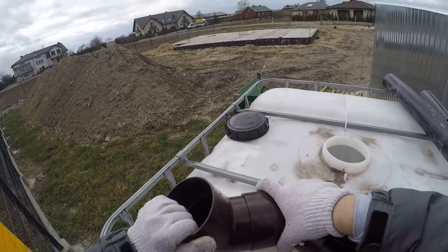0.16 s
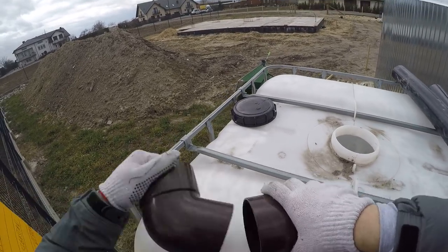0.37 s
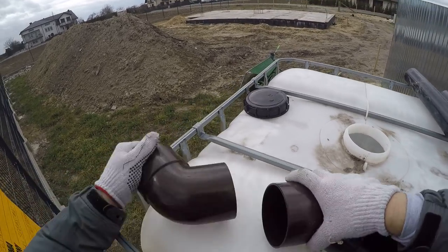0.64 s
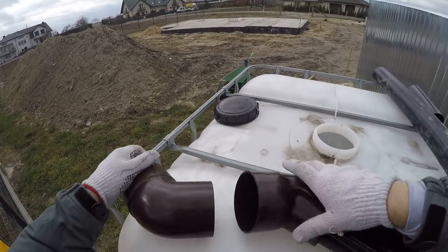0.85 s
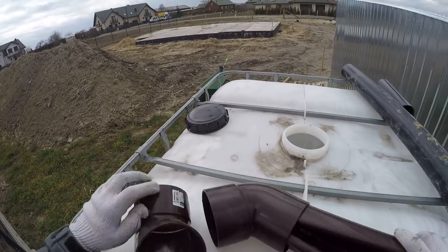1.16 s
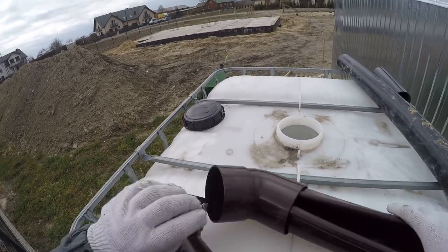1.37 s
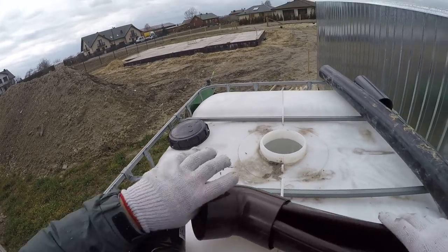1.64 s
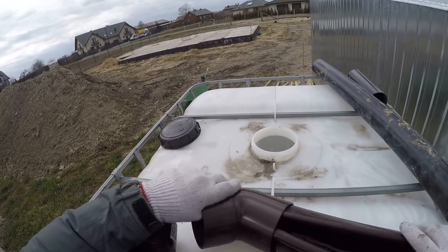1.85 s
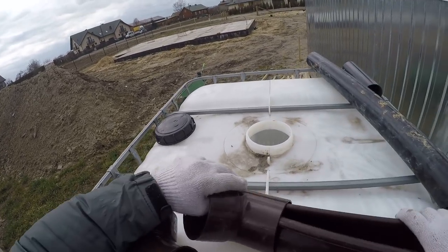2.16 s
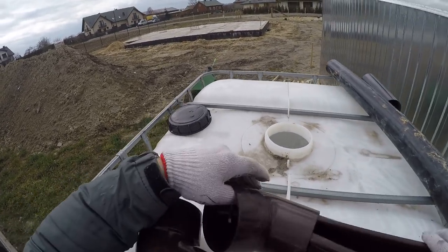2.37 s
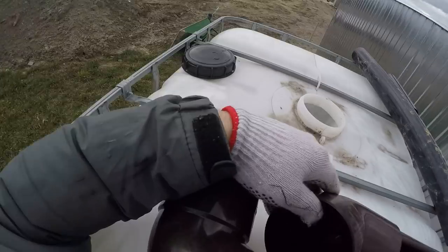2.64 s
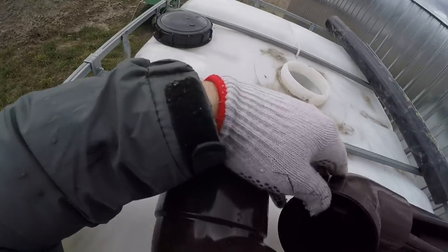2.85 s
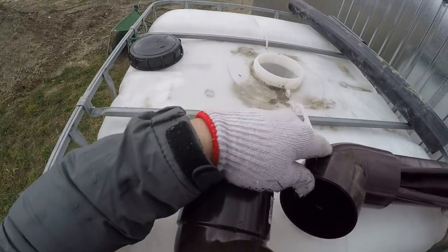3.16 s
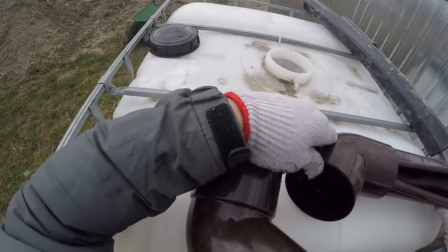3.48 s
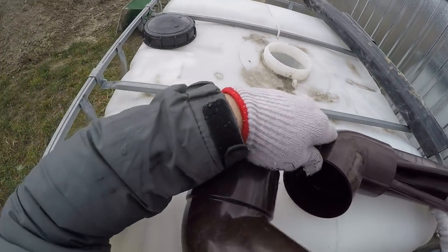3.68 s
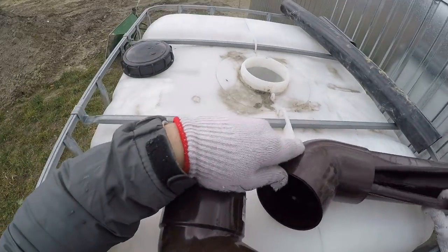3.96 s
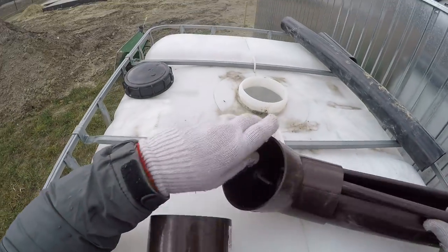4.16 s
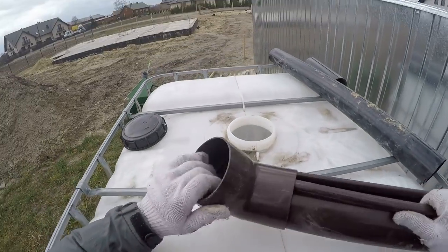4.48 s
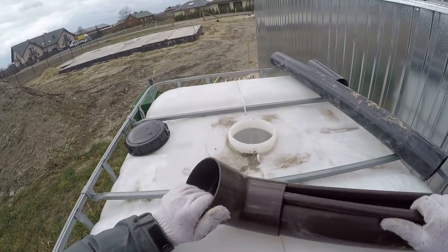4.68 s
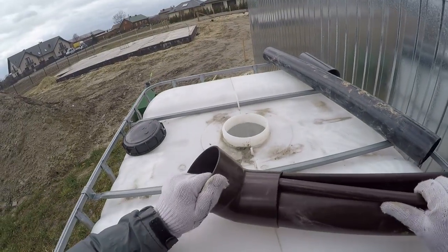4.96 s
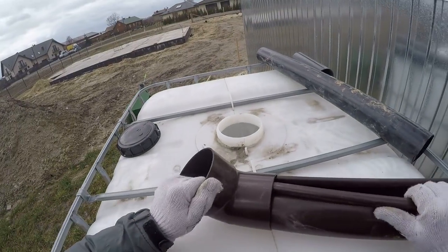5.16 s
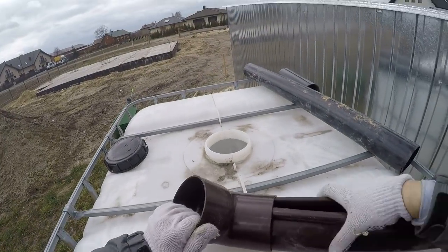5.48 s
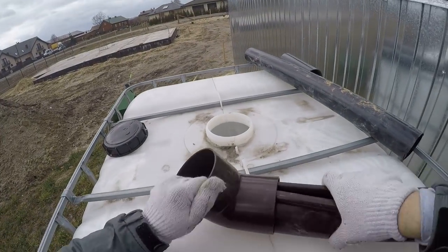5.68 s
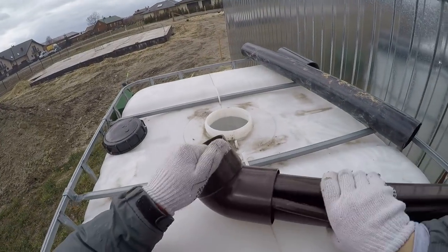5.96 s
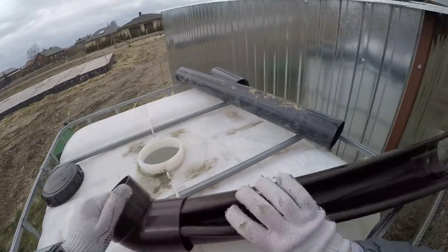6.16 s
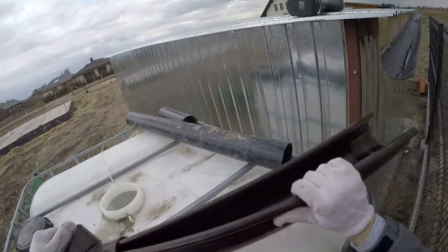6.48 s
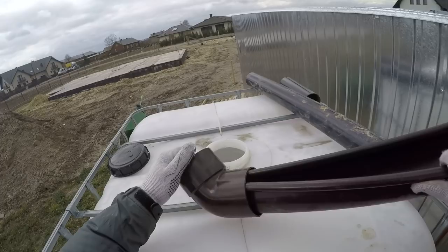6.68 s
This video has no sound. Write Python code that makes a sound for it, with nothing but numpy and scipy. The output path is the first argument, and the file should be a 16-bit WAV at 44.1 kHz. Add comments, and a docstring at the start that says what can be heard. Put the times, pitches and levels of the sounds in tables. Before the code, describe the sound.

Low, uneven wind rumble and puffs press on a close body-worn microphone throughout, with soft glove rubbing and faint sleeve swish. At about 0.35 s a tight plastic joint gives a short gritty rasp, followed by clacks at 0.45-0.55 s and a strong hollow knock with tank boom near 0.75 s. Looser knocks continue at 1.0-1.15, 1.3 and 1.5 s, with duller bumps to 1.8 s, a thin click at 2.0 s and a double knock near 2.45 s. From 2.6 to 4 s it is mostly sleeve swish, light touches and faint cloth on the microphone. A cluster of clicks and clacks runs 4.05-4.6 s, capped by a loud knock at 4.65 s. A deep tank thud lands at 5.5 s, then a stuttering scrape at 5.7-5.9 s. After 6 s, dull cloth rustles at 6.2 and 6.6 s, a few clacks, and a final booming bump at 6.8 s.

```python
"""Gloved hands part a plastic elbow from a length of gutter and refit it on a big water tank outdoors.
From the start, noise bands for wind rumble and buffet, and for glove and sleeve rubbing close to the microphone;
light finger touches join in. From 0.3 s a joint rasps: stick-slip noise bursts that also ring the wall and bore.
From 0.5 s knocks: noise ticks, decaying modes of clacking wall, hollow bore and booming tank, plus shudder.
From 3 s, louder after 6 s, cloth drags on the microphone's case: dull noise largely opposed left to right."""
import sys
import numpy as np
from scipy import signal
from scipy.fft import rfft, irfft, next_fast_len
from scipy.io import wavfile
from scipy.ndimage import uniform_filter1d

SR = 44100
rng = np.random.default_rng(int(sys.argv[2]) if len(sys.argv) > 2 else 0)


def file_out(sig):
    """Save sig as 16-bit WAV at sys.argv[1]."""
    # one column per channel
    cols = np.atleast_2d(sig).T
    # limit, then scale
    lim = np.clip(cols, -1, 1)
    pcm = np.round(lim * 32767).astype(np.int16)
    wavfile.write(sys.argv[1], SR, pcm)


N = 301203


def from_db(db):
    """Decibels to amplitude gain."""
    return 10 ** (np.asarray(db) / 20)


def rms_one(x):
    """Scale to unit power."""
    return x / np.sqrt(np.mean(x ** 2) + 1e-20)


def steady(x, span_s):
    """Divide out the slow level swings of a noise, so that its level follows its driving force."""
    power = uniform_filter1d(np.mean(x ** 2, axis=0), max(2, int(span_s * SR)))
    return x / np.sqrt(power + 1e-6)


def attack_one(x, span_s):
    """Unit power over the first moments of a blow."""
    x = rms_one(x)
    return x / np.sqrt(np.mean(x[:, :int(span_s * SR)] ** 2))


def in_time(rows):
    """Interpolate each column of a time curve to every sample."""
    s, *columns = np.transpose(rows)
    t = np.arange(N) / SR
    return [np.interp(t, s, column) for column in columns]


def at_hz(points, hz):
    """Read a spectrum on a log-frequency axis."""
    f, value = np.transpose(points)
    return np.interp(np.log(hz + 1e-3), np.log(f), value)


def add(out, sound, start_s):
    """Mix a sound in from start_s."""
    at = max(0, round(start_s * SR))
    out[:, at:at + sound.shape[1]] += sound[:, :max(0, N - at)]


def swell(middle_s, length_s, flatness=2):
    """Amplitude of a movement that gathers speed and slows again; flatness 2 is a bell, more a plateau."""
    offset = 2 * (np.arange(N) / SR - middle_s) / length_s
    return np.exp(-np.minimum(np.abs(offset) ** flatness / 2, 20))


def movements(rows, flatness=2):
    """Summed power over time of movements: middle_s, length_s, level_db."""
    return sum(from_db(db) ** 2 * swell(s, length, flatness) ** 2 for s, length, db in rows)


def flutter(knots_per_s, size):
    """Unit-power random wobble, linear between random knots."""
    knots = rng.standard_normal(size // 16 + 2)
    return rms_one(np.interp(np.arange(size) * knots_per_s / SR, np.arange(len(knots)), knots))


# gutter resonances that colour the rubbing: pitch_hz, width_hz, level_db
HOLLOW = [(470, 210, 2.5), (830, 56, -7), (1020, 40, -11), (1720, 190, -19), (2140, 130, -14),
          (2660, 130, -17), (3760, 170, -31), (4530, 140, -23)]
# left-right correlation of airborne sounds and sleeve: freq_hz, likeness (1 = same)
AIR_LIKENESS = [(100, 1), (500, 1), (2000, 1), (3500, 1), (5500, 0.79), (9000, 0.52), (15000, 0.093)]


def coloured(drive, spectrum, tilt_db=0, hollow=False, likeness=AIR_LIKENESS):
    """Filter two unrelated drives to a stereo spectrum of unit power, optionally through the gutter."""
    size = drive.shape[1]
    padded = next_fast_len(size)
    hz = np.arange(padded // 2 + 1) * SR / padded
    mid, side = rfft(drive, padded)
    alike = np.clip(at_hz(likeness, hz), -.995, .995)
    octaves = np.log2((hz + 20) / 2000)
    colour = from_db(at_hz(spectrum, hz) + tilt_db * octaves) * hz / (hz + 2)
    if hollow:
        resonances = sum(from_db(db) / (1 + 2j * (hz - f) / width) for f, width, db in HOLLOW)
        colour = colour * (1 + resonances)
    pair = np.sqrt(1 + alike) * mid + np.sqrt(1 - alike) * side * [[1], [-1]]
    return rms_one(irfft(pair * colour, padded)[:, :size])


def noise(spectrum, size, grain_db=0, hollow=False, likeness=AIR_LIKENESS):
    """Friction or air noise made of grains of uneven size."""
    grain_sizes = from_db(grain_db * np.clip(flutter(2500, size), -3, 3))
    grains = rng.standard_normal((2, size)) * grain_sizes
    return coloured(grains, spectrum, hollow=hollow, likeness=likeness)


# wind levels before puffs and lumps: time_s, gust_db, buffet_db
WIND = [(0, -17.5, -31.5), (0.6, -19, -35.5), (1.1, -18.5, -30), (1.4, -17, -32.5), (1.65, -14, -32.5),
        (2.15, -19.5, -38), (2.45, -14.5, -32), (3.1, -14, -28.5), (3.55, -16.5, -31), (4.55, -15.5, -30.5),
        (4.85, -21.5, -36), (5.35, -18, -38.5), (5.55, -14.5, -28.5), (5.95, -15, -21.5),
        (6.22, -17, -39.5), (6.6, -15, -29.5), (6.82, -13.5, -25.5)]
# short puffs: middle_s, rise_db
PUFFS = [(0.189, 13), (0.3, 8), (1.07, 7.5), (1.25, 8.5), (1.69, 6.5), (3.81, 7), (5.16, 10), (5.51, 3),
         (5.73, 5), (6.53, 6.5)]
# relative spectra: freq_hz, density_db_per_hz
GUST = [(14, 2.5), (22, 7.5), (32, 0.5), (45, -3), (65, -6), (95, -11.5), (130, -22), (220, -30),
        (500, -79)]
BUFFET = [(60, -16.5), (100, 1.5), (130, 1), (190, -3.5), (280, -6), (400, -12), (500, -16), (700, -20),
          (1400, -46.5)]
# correlation of the two microphone ports in wind: freq_hz, likeness
PORT_LIKENESS = [(25, 0.91), (80, 0.54), (180, 0.69), (400, 0.87), (1000, 0.76)]
PUFF_S, BUFFET_SURGE_SHARE = 0.037, 0.43


def wind(lump_knots_per_s=16, lumps_db=2):
    """Slow eddies push on the microphone ports in lumps and puffs; smaller ones flutter above them."""
    gust_db, buffet_db = in_time(WIND)
    puffs_db = sum(db * swell(s, PUFF_S) for s, db in PUFFS)
    surge_db = puffs_db + lumps_db * flutter(lump_knots_per_s, N)
    deep = steady(noise(GUST, N, likeness=PORT_LIKENESS), span_s=0.0714)
    upper = steady(noise(BUFFET, N, likeness=PORT_LIKENESS), span_s=0.1)
    rumble = from_db(gust_db + surge_db) * deep
    return rumble + from_db(buffet_db + BUFFET_SURGE_SHARE * surge_db) * upper


# hands shift their grip, before trims: middle_s, length_s, glove_db, slide_db
GRIPS = [(0.019, 0.046, -31.5, -42.5), (0.16, .07, -37.5, -46), (0.403, 0.042, -31, -36),
         (0.554, .08, -31, -36.5), (0.68, 0.27, -41, -45.5), (1.115, 0.079, -30.5, -41),
         (1.253, .06, -36.5, -41), (1.553, 0.064, -36, -44.5), (1.736, 0.14, -53, -50),
         (1.95, 0.038, -39, -37), (2.165, 0.059, -47, -47.5), (2.393, 0.14, -44, -47),
         (2.993, 0.069, -34, -42), (3.085, .05, -36.5, -38), (3.19, 0.072, -43, -50),
         (3.37, 0.055, -40, -51), (3.8, 0.096, -45, -53.5), (4.112, .08, -36, -40.5),
         (4.224, .05, -33, -43), (4.29, 0.11, -39, -34.5), (4.48, 0.29, -41.5, -44.5),
         (4.696, 0.28, -44.5, -58), (4.928, 0.07, -40.5, -47), (5.06, 0.036, -60, -49),
         (5.24, 0.064, -35.5, -41), (5.43, 0.058, -41, -47.5), (5.515, 0.078, -36.5, -43),
         (5.782, .24, -31.5, -38), (6.113, 0.19, -33, -42), (6.24, 0.072, -30, -45),
         (6.53, 0.32, -37.5, -45.5), (6.63, 0.055, -36, -36.5), (6.806, 0.091, -35.5, -60.5)]
# arm reaches, sleeve swishes: middle_s, length_s, sleeve_db
REACHES = [(0.04, 0.025, -41.5), (1.15, 0.23, -41.5), (1.94, 0.34, -43.5), (2.45, 0.2, -41),
           (2.6, 0.19, -35.5), (2.84, 0.38, -34), (3.12, 0.24, -39.5), (4.24, 0.5, -40), (4.94, .05, -43.5),
           (6.19, 0.23, -41.5), (6.63, 0.2, -40.5)]
# faint rustle of holding hands, less in pauses, added to the REST levels: time_s, change_db
FIDGET = [(0, 4.5), (0.3, -1), (0.7, 2), (1.42, 0), (2.05, 2.5), (2.25, -3.5), (2.6, -5), (3.3, 5.5),
          (3.5, -2.5), (3.9, -0.5), (4.4, 5.5), (4.77, -0.5), (5.4, 3), (6.35, 4), (6.82, -3.5)]
REACH_FLATNESS = 4.4
REACH_GLOVE_DB, REACH_SLIDE_DB = -9.5, -11  # drag on the gutter, relative to the sleeve
KNIT_HISS_DB = -5.5  # relative to the sliding
REST_GLOVE_DB, REST_SLIDE_DB, REST_SLEEVE_DB = -47, -55.5, -51.5


def friction_levels():
    """Levels in dB of glove, sliding plastic and sleeve: powers of grips, reaches and resting hands add."""
    grip_glove = movements([(s, length, db) for s, length, db, _ in GRIPS])
    grip_slide = movements([(s, length, db) for s, length, _, db in GRIPS])
    arm = movements(REACHES, REACH_FLATNESS)
    fidget_db, = in_time(FIDGET)
    glove = grip_glove + arm * from_db(REACH_GLOVE_DB) ** 2 + from_db(fidget_db + REST_GLOVE_DB) ** 2
    slide = grip_slide + arm * from_db(REACH_SLIDE_DB) ** 2 + from_db(fidget_db + REST_SLIDE_DB) ** 2
    sleeve = arm + grip_slide * from_db(KNIT_HISS_DB) ** 2 + from_db(fidget_db + REST_SLEEVE_DB) ** 2
    return 10 * np.log10([glove, slide, sleeve])


# rasp of grit and joint, relative: freq_hz, density_db_per_hz
RASP = [(120, -36), (280, 1), (400, 3), (600, -19.5), (1200, -9.5), (2300, -4), (4000, -8.5), (6500, -2.5),
        (9500, -4.5), (12000, -9.5), (15500, -13)]


def grit(specks_per_s=45, size_db=5):
    """Specks of dirt catch under the gloves: sparse random impulses tick through the gutter."""
    caught = rng.random(N) < specks_per_s / SR
    sizes = from_db(size_db * np.minimum(rng.exponential(1, N), 2))
    ticks = caught * sizes * rng.choice([-1, 1], (2, N))
    return coloured(ticks, RASP, tilt_db=-0.5, hollow=True)


# relative spectra of glove, sliding plastic, sleeve and its fibres' fizz: freq_hz, density_db_per_hz
GLOVE = [(250, -38), (450, -3.5), (800, 1), (1300, -1), (2100, -7), (3200, -21), (6000, -28)]
SLIDE = [(1400, -18), (2400, -1.5), (3300, -1), (5200, -3.5), (7000, -15), (12000, -38)]
SLEEVE = [(3000, -12.5), (5000, -8), (6800, -5), (9300, -6.5), (11500, -16.5), (15500, -18.5)]
FIZZ = [(7000, -25), (10000, -1), (12500, -1), (15500, -7)]
GLOVE_TRIM_DB, SLIDE_TRIM_DB = -1.5, -1


def rubbing(catch_db=2.0, grit_db=-3, fizz_db=-7, brisk_db=-37, fizz_growth=1.55):
    """Gloves and plastic drag with small catches; fizz outgrows the swish, so louder moves are brighter."""
    glove_db, slide_db, sleeve_db = friction_levels()
    catches = from_db(catch_db * flutter(140, N))
    knit = noise(GLOVE, N, grain_db=3.0, hollow=True)
    sliding = noise(SLIDE, N, grain_db=1.5, hollow=True) + from_db(grit_db) * grit()
    on_gutter = from_db(glove_db + GLOVE_TRIM_DB) * knit + from_db(slide_db + SLIDE_TRIM_DB) * sliding
    swish = from_db(sleeve_db) * noise(SLEEVE, N, grain_db=-0.5)
    # at brisk_db the fizz lies fizz_db below the sleeve
    fizz_level_db = brisk_db + fizz_db + fizz_growth * (sleeve_db - brisk_db)
    fizz = from_db(fizz_level_db) * noise(FIZZ, N)
    return on_gutter * catches + swish + fizz


def struck(modes, t, rise_s, scatter_db, spread, shade_db=0):
    """Decaying modes of one blow; level, sign and pitch vary a little, high modes differ more by ear."""
    hz, db, t60_s = np.transpose(modes)[:, :, None]
    strength, grip, sign, lean, turn = rng.standard_normal((5, len(modes), 1))
    level_db = db + shade_db + scatter_db * strength
    fading = np.sign(sign) * from_db(level_db - 60 * t / t60_s)
    phase = 2 * np.pi * hz * (1 + 0.013 * grip) * t
    apart = spread * (1 + (hz / 2500) ** 2)
    ears = []
    for ear in (1, -1):
        gain = fading * (1 + ear * apart * lean)
        ears.append(np.sum(gain * np.sin(phase + ear * apart * turn), axis=0))
    return np.array(ears) * (1 - np.exp(-t / rise_s))


# blows, levels before trims: start_s, tank_db, bore_db, wall_db, favoured_wall_hz, hardness_db_per_octave
KNOCKS = [(0.455, -15.5, -15.5, -18, 1130, -2), (0.4927, -20.5, -20, -23.5, 1150, -0.5),
          (0.5124, -27, -26, -35, 3600, -4), (0.551, -33, -25, -27.5, 3180, -3),
          (0.7307, -10, -16.5, -18.5, 1220, -1), (0.7546, -17.5, -29.5, -19, 5440, 1.5),
          (0.765, -15.5, -19, -21, 1200, -7), (0.9968, -24.5, -34, -30, 1093, -2.5),
          (1.011, -23, -31.5, -30, 1250, -10), (1.0754, -22, -26, -22, 1300, -6),
          (1.1348, -24, -19, -23, 3770, -2.5), (1.3094, -15, -16.5, -17, 4480, 1.5),
          (1.5181, -31, -10, -14, 2500, -1), (1.6507, -19.5, -32, -25.5, 980, -5.5),
          (1.7281, -25, -32.5, -30.5, 900, -3.5), (1.8191, -22, -51, -31.5, 940, -7),
          (2.0294, -38, -25.5, -18, 2800, 3.5), (2.189, -49, -58, -44.5, 4300, 6.5),
          (2.45, -23, -40, -27, 1100, 0), (2.468, -19, -17.5, -24.5, 2480, -4),
          (3.2578, -37, -39, -36, 830, -7), (3.405, -42, -56, -37, 5030, 2.5),
          (4.0549, -36, -28.5, -31.5, 900, -11), (4.173, -27, -28.5, -38.5, 5810, 7),
          (4.22, -23, -17, -13, 1110, -1), (4.265, -16.5, -21, -21, 5400, -2.5),
          (4.291, -23, -23, -36, 5930, -2), (4.377, -29, -32, -28, 5700, 0),
          (4.394, -26, -19, -26, 810, -7), (4.4722, -33, -23, -31.5, 890, -3),
          (4.5071, -31, -33, -34, 4890, 2), (4.5671, -24.5, -24.5, -18.5, 1570, -5),
          (4.6378, -7.5, -15, -13.5, 2140, -1.5), (4.675, -26, -22, -29, 815, -7.5),
          (4.692, -24, -36, -33, 900, -6), (5.015, -54, -48, -40, 3570, -3),
          (5.136, -41, -36, -36, 1710, -4), (5.1635, -44, -25.5, -23.5, 890, -13),
          (5.1862, -46, -50, -28, 3600, -1), (5.347, -34, -49, -35.5, 3950, -2),
          (5.511, -11.5, -22.5, -28.5, 880, -3), (5.6759, -50, -33, -26, 3370, 1),
          (5.687, -33, -24, -21, 2750, -4), (5.695, -17, -18, -20, 1100, -14),
          (5.969, -52, -27.5, -31, 1460, -1), (5.988, -47, -45, -27.5, 3700, -2.5),
          (6.0528, -36, -20, -26, 1130, -17), (6.4549, -56, -24.5, -21, 1500, -3.5),
          (6.765, -27, -24, -28, 1040, -9.5), (6.773, -37, -37, -23.5, 1020, -9.5),
          (6.821, -10, -17, -24.5, 810, -10)]
FIRM_BORE_DB = -18.5  # louder bore: firm, rebounds once
REBOUND_S, REBOUND_SPREAD = .023, .25  # spread: share of the delay, either way
REBOUND_LOSS_DB, REBOUND_DULLING_DB_PER_OCTAVE = 18, 3
# light finger touches, in KNOCKS terms
TOUCHES_PER_S, TOUCH_SCATTER_DB = 2.5, 5
TOUCH_TANK_DB, TOUCH_BORE_DB, TOUCH_WALL_DB = -40.5, -46, -45.5
TOUCH_CENTRE_HZ, TOUCH_HARDNESS_DB_PER_OCTAVE = 3600, 1.5  # note within an octave either way


def contacts(count=24):
    """The knocks, one weaker and duller rebound of each firm one, and light touches at uneven intervals."""
    delays_s = REBOUND_S * (1 + REBOUND_SPREAD * rng.uniform(-1, 1, len(KNOCKS)))
    rebounds = []
    for (s, tank, bore, wall, hz, hardness), delay_s in zip(KNOCKS, delays_s):
        if bore > FIRM_BORE_DB:
            levels_db = [db - REBOUND_LOSS_DB for db in (tank, bore, wall)]
            rebounds.append((s + delay_s, *levels_db, hz, hardness - REBOUND_DULLING_DB_PER_OCTAVE))
    touches = []
    for k, (when, force, spot) in enumerate(rng.uniform(-1, 1, size=(count, 3))):
        start_s = (k + .5 + when / 2) / TOUCHES_PER_S
        wall_db = TOUCH_WALL_DB + TOUCH_SCATTER_DB * force
        note_hz = TOUCH_CENTRE_HZ * 2 ** spot
        touches.append((start_s, TOUCH_TANK_DB, TOUCH_BORE_DB, wall_db, note_hz,
                        TOUCH_HARDNESS_DB_PER_OCTAVE))
    return KNOCKS + rebounds + touches


# modes of wall bending, bore air column and tank top, nominal: pitch_hz, level_db, t60_s
WALL = [(776, -4.5, 0.052), (952, -2.5, 0.039), (1117, 4, 0.02), (1300, -0.5, 0.024), (1587, 0.5, 0.024),
        (1820, 3.5, 0.013), (1973, -9, 0.052), (2220, -5, 0.04), (2480, 1, 0.023), (2800, 0.5, 0.026),
        (3153, 1, 0.018), (3603, 0.5, 0.022), (3910, -1, 0.024), (4330, 3.5, 0.015), (4770, 3.5, 0.016),
        (5160, -5, 0.03), (5500, -10, 0.0069), (5630, 7.5, 0.0073), (6940, -11.5, 0.015)]
BORE = [(425, 6, 0.041), (500, 3, 0.12), (576, -1.5, 0.055), (660, -9.5, 0.068)]
TANK = [(79, 4, 0.081), (122.8, 4, 0.18), (166.6, -7.5, 0.29), (203.4, 0.5, 0.2), (256.8, -2, 0.21),
        (298.5, -5.5, 0.14), (354.6, -5, 0.16)]
# relative spectra of edge tick and the tank's many faint modes: freq_hz, density_db_per_hz
TICK = [(500, -7.5), (2000, -5), (4500, 1), (6500, 1.5), (9000, 1.5), (11500, -8), (15500, -13)]
SHUDDER = [(50, 3), (100, 8.5), (200, 5.5), (400, -1.5), (700, -9), (1200, -15), (2500, -30), (5000, -81)]
TICK_DB, TICK_DB_PER_HARDNESS = -10.5, 1.3  # relative to the clack
TANK_TRIM_DB, WALL_TRIM_DB = -1, -0.8


def knocks(tick_s=0.0013, touch_s=0.00075, tail_s=.015, tail=0.036, bounce_s=0.0024, bounce=0.22,
           shudder_s=0.042, shudder_db=-7, favour_db=8, favour_octaves=0.17):
    """Each contact: an edge tick, the clack of the wall, the bore's note and the tank's boom."""
    out, t = np.zeros((2, N)), np.arange(SR // 4) / SR
    wall_hz = np.array(WALL)[:, :1]
    touch = (1 - np.exp(-t / touch_s)) * (np.exp(-t / tick_s) + tail * np.exp(-t / tail_s))
    shudder_shape = (1 - np.exp(-t / 0.00067)) * np.exp(-t / shudder_s)
    for start_s, tank_db, bore_db, wall_db, note_hz, hardness in contacts():
        # hard contact lifts high modes; the spot hit favours modes near one note
        octaves = np.log2(wall_hz / note_hz)
        shade_db = hardness * octaves + favour_db * np.exp(-(octaves / favour_octaves) ** 2)
        wall = struck(WALL, t, rise_s=0.00029, scatter_db=2.5, spread=0.041, shade_db=shade_db)
        clack = attack_one(wall, 0.011)
        # the springy rim touches again within about 5 ms
        again = np.interp(t - bounce_s * rng.uniform(0.17, 2.1), t, touch)
        contact = touch + bounce * again
        edge = attack_one(noise(TICK, len(t), grain_db=6.5) * contact, 0.032)
        note = attack_one(struck(BORE, t, rise_s=0.00017, scatter_db=2.0, spread=0.012), 0.0086)
        shudder = attack_one(noise(SHUDDER, len(t)) * shudder_shape, 0.036)
        panel = attack_one(struck(TANK, t, rise_s=0.0004, scatter_db=1.5, spread=0.0073), 0.032)
        boom = panel + from_db(shudder_db) * shudder
        edge_db = wall_db + TICK_DB + TICK_DB_PER_HARDNESS * hardness
        plastic = from_db(wall_db + WALL_TRIM_DB) * clack + from_db(edge_db) * edge
        plastic += from_db(bore_db) * note
        add(out, plastic + from_db(tank_db + TANK_TRIM_DB) * boom, start_s)
    return out


# joint strokes: start_s, end_s, level_db, level_change_db, brightness_db_per_octave, slip_scatter_db
SCRAPES = [(0.336, 0.412, -17.5, 0, 1, 3.5), (4.263, 4.36, -32, -35, -3, 5.5),
           (5.678, 5.705, -21.5, -1, -1.9, 17), (5.714, 5.836, -21.5, -5, -2.5, 3),
           (5.846, 5.926, -23.5, -4, -2.4, 8)]


def scrapes(slips_per_s=400, slip_s=0.0039, edge_s=0.0032, drag=0.62, ring_db=-5, bore_db=-13,
            bore_growth=4):
    """The tight joint sticks and slips: each jerk is a burst of rasp that also rings wall and bore."""
    out, t = np.zeros((2, N)), np.arange(SR // 4) / SR
    for start_s, end_s, level_db, change_db, bright, slip_db in SCRAPES:
        size = int(np.clip((end_s - start_s) * SR, 256, len(t)))
        # a slip at every whole step of unevenly paced travel
        travel = np.cumsum(slips_per_s / SR * from_db(5 * flutter(600, len(t))))
        slip_sizes = from_db(slip_db * np.clip(rng.standard_normal(len(t)), -2, 2))
        slips = np.diff(np.floor(travel), prepend=-1) * slip_sizes
        friction = drag + signal.lfilter([1], [1, -np.exp(-1 / (slip_s * SR))], slips)
        grains = rng.standard_normal((2, len(t))) * friction
        rasp = steady(coloured(grains, RASP, tilt_db=bright, hollow=True), span_s=0.032)
        wall = struck(WALL, t, rise_s=.0003, scatter_db=2, spread=.05)
        ringing = signal.fftconvolve(wall, slips[None, :], axes=1)
        bore = struck(BORE, t, rise_s=0.0021, scatter_db=9.0, spread=.02)
        hoot = signal.fftconvolve(bore, slips[None, :], axes=1)
        # a duller stroke sounds the bore more
        hoot_db = bore_db - bore_growth * bright
        body = from_db(ring_db) * rms_one(ringing[:, :size]) + from_db(hoot_db) * rms_one(hoot[:, :size])
        stroke_db = level_db + change_db * np.linspace(-.5, .5, size)
        stroke = signal.windows.tukey(size, 2 * edge_s * SR / size) * from_db(stroke_db)
        add(out, rms_one(rms_one(rasp[:, :size]) + body) * stroke, start_s)
    return out


# cloth drags on the microphone's case: middle_s, length_s, level_db
BRUSHES = [(3.04, 0.27, -38), (3.36, 0.065, -36.5), (4.1, 0.12, -40), (6.18, 0.15, -23),
           (6.37, 0.069, -31.5), (6.62, 0.088, -24.5), (6.82, 0.08, -38)]
# relative spectrum of the dull rustle: freq_hz, density_db_per_hz
CASE = [(200, -22), (330, 1.5), (440, -3.5), (560, 1), (680, -0.5), (770, -4), (880, -4.5), (1080, -13.5),
        (1600, -11.5), (2500, -17), (4000, -26.5), (8000, -54)]
# port correlation, negative = opposed, limited in use: freq_hz, likeness
CASE_LIKENESS = [(300, -0.83), (550, -0.56), (680, 0.47), (880, -1.36), (1500, -0.23), (3000, 0.49)]


def brushing():
    """Cloth on the case shakes the two microphone ports, in opposite directions over much of the band."""
    rustle = noise(CASE, N, grain_db=0.5, likeness=CASE_LIKENESS)
    return np.sqrt(movements(BRUSHES)) * rustle


def scene():
    """Handling slightly to the left, with cloth and wind at the microphone."""
    handling = knocks() + scrapes() + rubbing()
    return handling * from_db([[.4], [-.4]]) + brushing() + wind()


def record(dry, top=0.9, cutoff_hz=15350):
    """Flatten the loudest peaks and cut the top of the treble."""
    limited = dry / (1 + (dry / top) ** 8) ** (1 / 8)
    return signal.sosfilt(signal.ellip(10, .1, 90, cutoff_hz, fs=SR, output="sos"), limited)


dry = scene()
out = record(dry)
file_out(out)
```